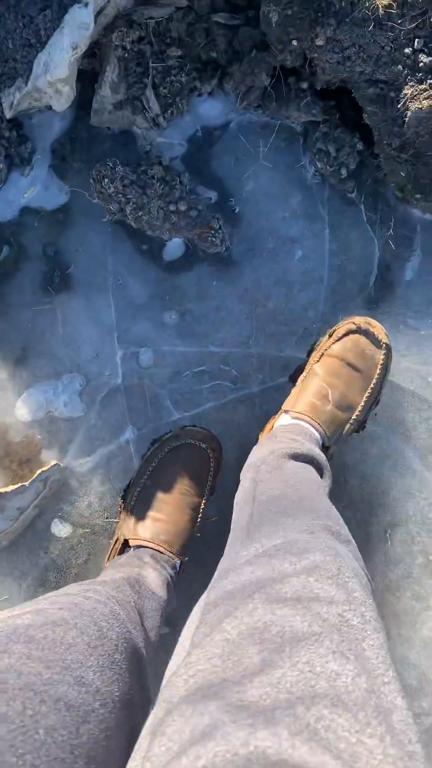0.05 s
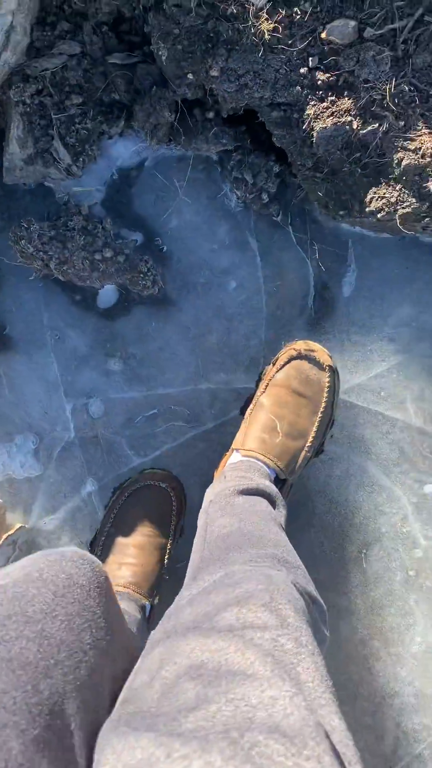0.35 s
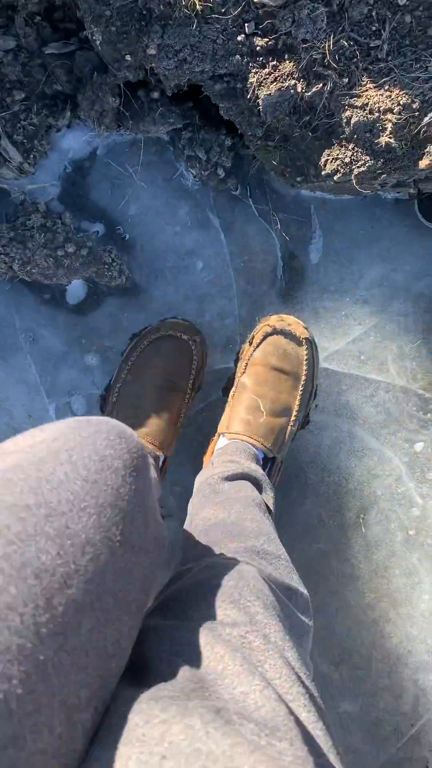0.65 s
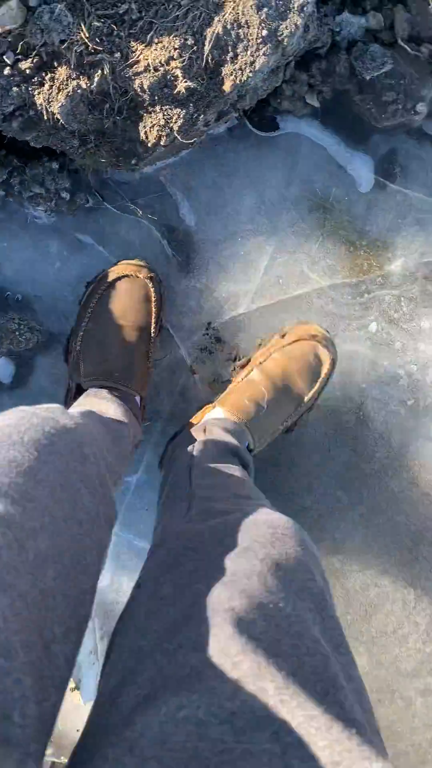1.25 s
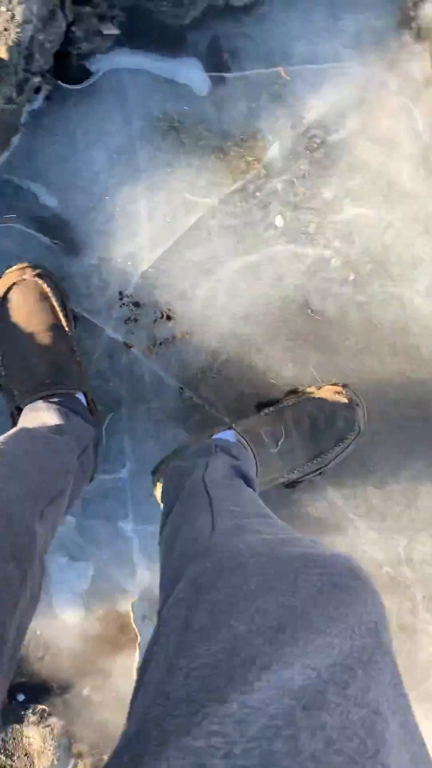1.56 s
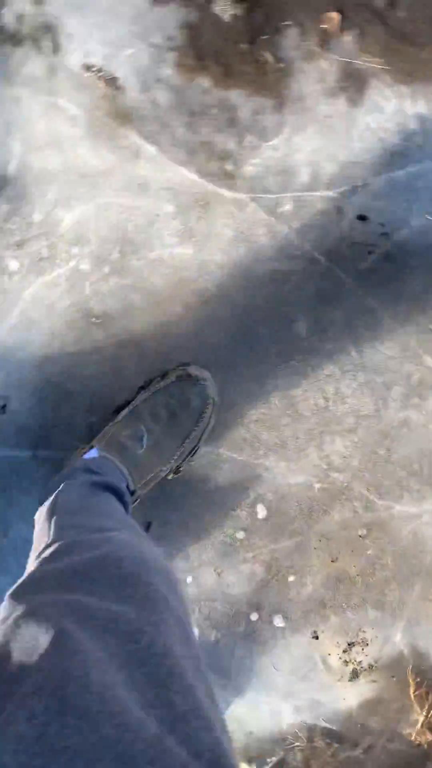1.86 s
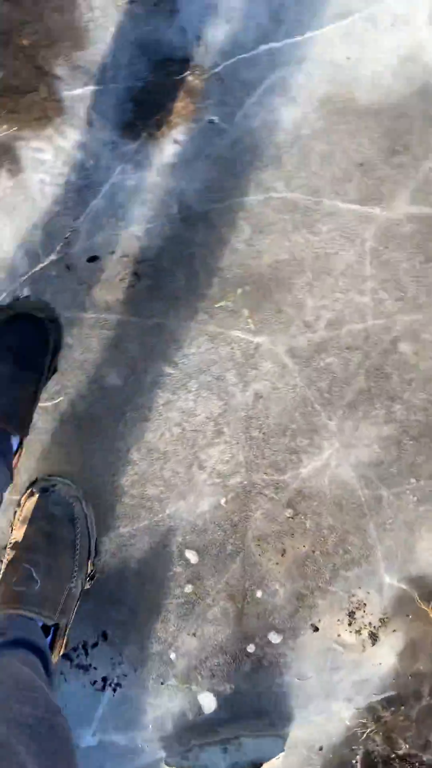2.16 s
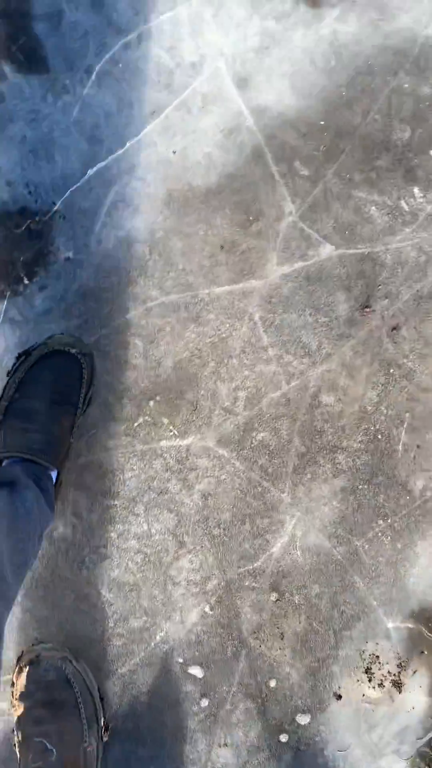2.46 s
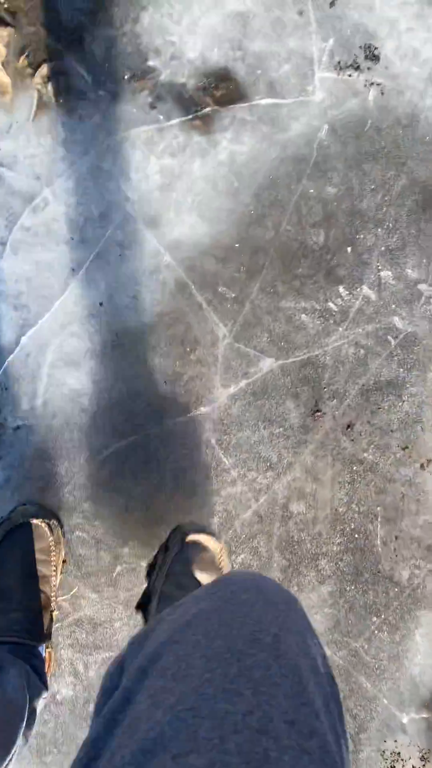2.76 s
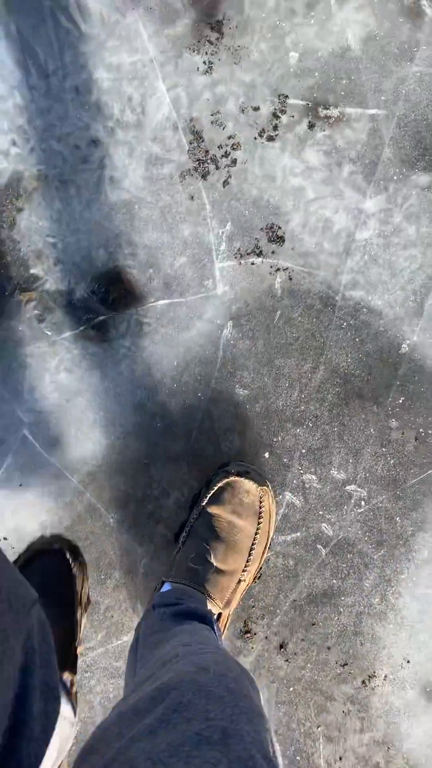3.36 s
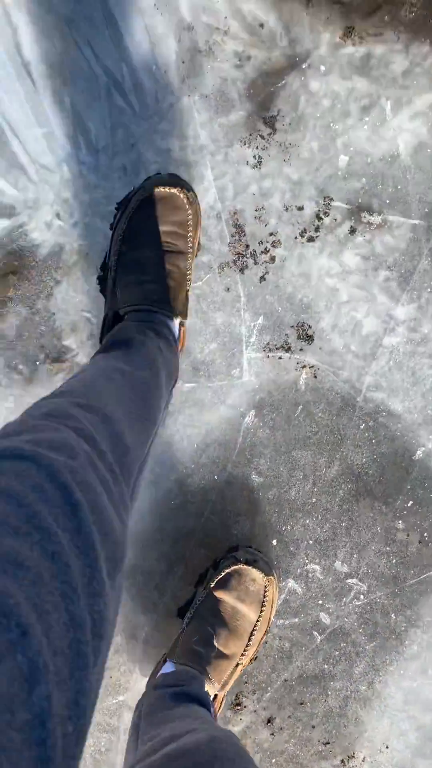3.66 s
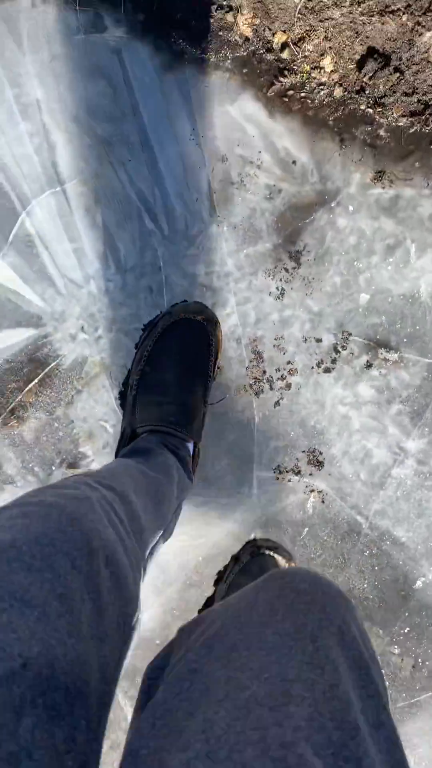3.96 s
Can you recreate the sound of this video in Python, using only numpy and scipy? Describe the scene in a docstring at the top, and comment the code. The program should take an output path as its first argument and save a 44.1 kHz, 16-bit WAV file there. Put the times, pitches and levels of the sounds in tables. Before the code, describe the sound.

Slow steps on a frozen puddle make the ice snap, crackle and creak.

```python
"""Ice cracks under slow steps in soft shoes on a frozen puddle, heard from a phone held above the feet.
Each crack is a snap, then a bending wave whose low notes arrive late: a tiny falling chirp.
Close by, soles scuff over frost, drag and creak, crumbs of ice tick and heels thud softly.
Far off, in the low outdoor rumble, an engine hums and slows a little."""
import sys
import numpy as np
from scipy import signal
from scipy.fft import rfft, irfft
from scipy.io import wavfile
from scipy.ndimage import uniform_filter1d

SR = 44100
rng = np.random.default_rng(int(sys.argv[2]) if len(sys.argv) > 2 else 0)


def transcribe(u):
    """Save the signal u as a 16-bit wav file named by the first command-line argument.

    u: samples, shape (n,) or (channels, n), limited to [-1, 1]; the rate is SR.
    q: integer samples, one column per channel.
    """
    v = np.clip(np.atleast_2d(u).T, -1, 1)
    q = np.round(v * 32767).astype(np.int16)
    wavfile.write(sys.argv[1], SR, q)


N = 176400

# spectrum of a breaking crumb of ice: f/Hz, level/dB
CRUMB_COLOUR = [(100, -17), (500, -8), (1500, -20.5), (3000, -4), (4600, 0), (6500, -5.5), (11000, 0),
                (16000, -7.5)]
FFT_SIZE, LEAD_SAMPLES = 4096, 128  # frame of one short sound, and the room left before its onset
BIN_HZ = np.fft.rfftfreq(FFT_SIZE, 1 / SR)
STEREO_ABOVE_HZ = 700  # below this the two microphones hear nearly the same


def undb(db):
    """Decibels to gain."""
    return 10 ** (np.asarray(db) / 20)


def colour(points, hz=BIN_HZ):
    """Gain at each frequency from points of f/Hz, level/dB."""
    f, db = np.array(points, float).T
    return undb(np.interp(np.log(hz + 1), np.log(f), db))


def shaped(x, points):
    """A sound given a colour, at unit level."""
    y = irfft(rfft(x) * colour(points, np.fft.rfftfreq(N, 1 / SR)), N)
    return y / y.std()


def burst(decay_s):
    """Spectrum of a dying burst of noise with unit energy."""
    y = rng.standard_normal(FFT_SIZE) * np.exp(-np.arange(FFT_SIZE) / SR / decay_s)
    return rfft(y / np.sqrt(np.sum(y ** 2)))


def add(out, at_s, y):
    """Mix a short sound in at a time."""
    i = max(int(at_s * SR), 0)
    out[i:i + len(y)] += y[:max(N - i, 0)]


def waver(per_s):
    """Smooth random drift around zero."""
    hold = int(SR / per_s)
    steps = np.repeat(rng.standard_normal(N // hold + 1), hold)
    return 0.81 * uniform_filter1d(uniform_filter1d(steps, hold), hold)[:N]


def grains(points, per_s=2000, spread_db=3):
    """Dense random clicks of one colour, a few much larger than the rest."""
    size = undb(spread_db * np.minimum(rng.exponential(size=N), 5))
    clicks = (rng.random(N) < per_s / SR) * size * np.sign(rng.standard_normal(N))
    return shaped(clicks, points)


def outdoor_rumble(t):
    """The background of the place: low noise that slowly sinks and swells."""
    # spectrum of the open air: f/Hz, level/dB
    air_colour = [(20, -41.5), (35, -14.5), (55, 4), (90, 0.5), (130, 3), (200, -12.5), (300, -19.5),
                  (500, -36), (1000, -45.5), (2500, -50), (5000, -48), (11000, -49.5), (16000, -42.5)]
    # its loudness: t/s, level/dB
    levels = [(0, -37.5), (.4, -45), (2.2, -44.5), (2.55, -39.5), (2.9, -42.5), (3.2, -41.5), (3.6, -39.5),
              (4, -35)]
    return shaped(rng.standard_normal(N), air_colour) * undb(np.interp(t, *np.array(levels).T))


def far_engine(t):
    """A four-cylinder engine so far away that only its low orders are left."""
    # the engine's run: t/s, firing f/Hz, level/dB
    run = [(0, 72.3, -72), (.4, 72.77, -43.5), (1, 74.06, -37.5), (1.501, 74.4, -38.5), (2.031, 75.02, -39),
           (2.151, 71.85, -38.5), (2.299, 64.24, -45.5), (2.701, 65.04, -44), (3.2, 65.8, -42),
           (4, 65.8, -39.5)]
    # its partials: multiple of the four-stroke cycle, relative level/dB
    orders = [(3, -19), (4, -6), (5, -16), (6, -15.5), (8, 1), (9, -11), (10, -17.5)]
    times, firing_hz, run_db = np.array(run).T
    cycle = 2 * np.pi * np.cumsum(np.interp(t, times, firing_hz)) / SR / 4  # four firings a cycle
    hum = 0
    for order, db in orders:
        gain = undb(db + 3 * waver(5))
        hum += gain * np.sin(order * cycle + 2 * np.pi * rng.random() + 0.075 * waver(7.3))
    return hum * undb(np.interp(t, times, run_db))


def heel_thuds(t, attack_s=0.001, pitch_sag=0.13):
    """Weight lands on the sheet: a few low cycles that sag in pitch."""
    # soft landings of heel and sole: t/s, starting f/Hz, level/dB, decay/s
    landings = [(.001, 213, -15.5, 0.0058), (1.583, 229, -30, 0.0087), (2.368, 220, -27, 0.0031),
                (2.576, 94, -16, 0.02), (2.614, 68.6, -19, 0.035), (2.663, 201, -24, 0.0069),
                (2.678, 72.5, -27, 0.058), (2.686, 229, -20, 0.007), (2.995, 70.5, -26.5, 0.016),
                (3.373, 189, -25, 0.01), (3.41, 76.4, -28.5, 0.062), (3.442, 233, -32.5, 0.015),
                (3.622, 71.6, -22, 0.039)]
    out, age = np.zeros(N), t[:N // 10]
    for at_s, hz, db, decay_s in landings:
        fade = np.exp(-age / decay_s)
        pitch = hz * (1 - pitch_sag * (1 - fade))
        envelope = undb(db) * (1 - np.exp(-age / attack_s)) * fade
        add(out, at_s, envelope * np.sin(2 * np.pi * np.cumsum(pitch) / SR))
    return out


def with_sheet_ring(x, db=-2.5):
    """The ice sheet rings on briefly after a sound with its own hollow notes."""
    # resonances of the sheet: f/Hz, relative level/dB, time to fall 60 dB/s
    modes = [(335, -4, 0.14), (522, -4.5, 0.11), (600, -1.5, 0.093), (716, 1.5, 0.12), (856, -6.5, 0.11),
             (1036, -3, 0.061), (1475, -17, 0.074), (1560, -9.5, 0.1), (1580, -14, 0.2), (2246, 1.5, 0.032),
             (2730, -10.5, 0.15)]
    age = np.arange(N // 20) / SR
    ring = 0
    for hz, mode_db, t60 in modes:
        damping = np.log(1000) / t60
        gain = undb(db + mode_db) * 2 * damping / SR
        ring += gain * np.exp(-damping * age) * np.cos(2 * np.pi * hz * age)
    return x + signal.fftconvolve(x, ring)[:N]


def jolt_sheet(out, at_s, gain, travel_s=.002, echo_db=-7):
    """Mix in one break or slip: a treble snap; below it a rough falling chirp and its rim echoes."""
    airborne_hz, sheet_top_hz = 3400, 1550  # above airborne_hz all arrives at once
    bending_hz = np.minimum(BIN_HZ, airborne_hz)
    # bending waves travel as the root of frequency; travel_s holds at 1 kHz
    lag = 2 * np.pi * travel_s * np.sqrt(1000) * (2 * np.sqrt(bending_hz) - bending_hz / airborne_hz**.5)
    sheet_share = 1 / (1 + (BIN_HZ / sheet_top_hz) ** 4)
    # a crack runs for a moment, which roughens its chirp
    roughness = undb(-2) * burst(decay_s=.0025) * np.minimum(BIN_HZ / sheet_top_hz, 1)
    # the first clear return from the near rim makes the knock hollow
    bounce_s = 0.0045 * (1 + 0.34 * rng.uniform(-0.93, 1))
    bounce = undb(-6.5) * sheet_share * np.exp(-2j * np.pi * BIN_HZ * bounce_s)
    knock = np.exp(2j * np.pi * rng.random()) * (1 + bounce)
    rim_echoes = undb(echo_db) * sheet_share * burst(decay_s=0.0066)
    snap = burst(decay_s=0.0008) + undb(-13) * burst(decay_s=0.0045)
    spectrum = np.sqrt(sheet_share) * (knock + roughness + rim_echoes) + np.sqrt(1 - sheet_share) * snap
    jolt = irfft(gain * np.exp(-1j * lag) * spectrum)
    add(out, at_s - LEAD_SAMPLES / SR, np.roll(jolt, LEAD_SAMPLES))


def frost_scuffs(t):
    """The sole catches and slips: dull rubbing, bright frost grit and lone crumbs swell together."""
    # scuffs of the sole: peak t/s, rise/s, fall/s, rubbing level/dB, grit level/dB
    strokes = [(.075, 0.07, 0.046, -44.5, -56), (0.2, 0.062, 0.038, -38, -34),
               (0.307, 0.059, 0.036, -49.5, -47.5), (0.407, 0.037, 0.04, -52.5, -47),
               (.53, 0.07, 0.087, -60.5, -63.5), (0.809, 0.055, 0.052, -63, -70),
               (0.931, 0.035, 0.028, -43.5, -47.5), (1.021, 0.065, 0.13, -49.5, -56.5),
               (1.3, 0.087, 0.091, -61, -64.5), (1.596, 0.033, 0.046, -55, -58.5),
               (1.691, 0.052, 0.054, -48.5, -54), (1.784, 0.057, 0.029, -50, -52.5),
               (2.3, .04, 0.14, -57, -62), (2.52, 0.2, 0.094, -52.5, -54.5),
               (2.535, 0.037, 0.039, -45.5, -40), (2.7, 0.27, 0.24, -67, -81),
               (3.072, 0.069, 0.067, -44, -36.5), (3.19, 0.071, 0.14, -60.5, -57.5),
               (3.459, 0.1, .1, -66, -64.5), (3.661, 0.026, 0.023, -34, -49.5),
               (3.781, 0.076, 0.11, -53.5, -48.5), (3.865, 0.038, 0.29, -92, -64)]
    # spectrum of the rubbing sole: f/Hz, level/dB
    rub_colour = [(100, -6), (300, 4.5), (520, 2.5), (750, -2), (1200, -2), (2000, -7.5), (3300, -5),
                  (4700, -7), (9000, -26), (16000, -35)]
    # spectrum of the frost grit: f/Hz, level/dB
    grit_colour = [(300, -43.5), (2000, -3.5), (3300, -0.5), (4700, -6.5), (6500, -4), (8700, -1.5),
                   (10500, 0.5), (13000, -5), (16000, -1.5)]
    rub_power, grit_power = np.zeros(N), np.zeros(N)
    for peak_s, rise_s, fall_s, rub_db, grit_db in strokes:
        width_s = np.where(t < peak_s, rise_s, fall_s)
        swell = np.exp(-np.abs((t - peak_s) / width_s) ** 2.13)
        rub_power += (swell * undb(rub_db)) ** 2
        grit_power += (swell * undb(grit_db)) ** 2
    rubbing = np.sqrt(rub_power) * grains(rub_colour)
    frost = np.sqrt(grit_power) * grains(grit_colour, per_s=900, spread_db=4)
    crumbs = np.sqrt(grit_power) * undb(-9) * grains(CRUMB_COLOUR, per_s=210, spread_db=4.5)
    return with_sheet_ring((rubbing + frost) * undb(1.4 * waver(160)) + crumbs)


def sole_squeak(age, sag_per_s=.08):
    """Narrow wavering resonances of the sole that sink a little as it slows."""
    # notes of the dragged sole: starting f/Hz, width/Hz, level/dB
    notes = [(730, 110, -0.5), (1330, 30, -7), (1750, 47, -8.5), (2030, 35, -10), (2313, 37, -6),
             (2670, 35, -4.5), (2980, 53, -11), (3470, 90, -5)]
    turn = 2 * np.pi * np.cumsum(np.exp(-sag_per_s * age)) / SR
    return sum(undb(db) * (waver(2 * width) * np.cos(hz * turn) + waver(2 * width) * np.sin(hz * turn))
               for hz, width, db in notes)


def sole_drag(t, attack_s=0.0072):
    """The sole rasps and squeaks as the foot pivots."""
    # pivot of the foot: start t/s, level/dB, decay/s
    pivots = [(1.649, -35, 0.052)]
    # spectrum of the rasp: f/Hz, level/dB
    rasp_colour = [(150, -22), (520, -2), (760, 4.5), (1150, -4.5), (1750, -11.5), (2500, 6), (3400, -4.5),
                   (4500, 1.5), (6500, -9.5), (16000, -12.5)]
    out = np.zeros(N)
    for at_s, db, decay_s in pivots:
        age = np.maximum(t - at_s, 0)
        envelope = undb(db) * (1 - np.exp(-age / attack_s)) * np.exp(-age / decay_s)
        out += envelope * (grains(rasp_colour) + undb(-4.5) * sole_squeak(age))
    return with_sheet_ring(out)


def sole_creak(first_gap_s=.0075, slowing=1.135, jitter_s=.0006):
    """The sole sticks and slips under load, in a run of slips that slows down."""
    # run of slips: start t/s, number of slips, level/dB
    creaks = [(.999, 8, -10)]
    # spectrum of one slip: f/Hz, level/dB
    slip_colour = [(200, -17), (500, -10.5), (800, 5.5), (1300, -3), (2000, -11), (3400, 0.5), (4700, -5),
                   (7000, -11.5), (16000, -27)]
    out = np.zeros(N)
    for at_s, slips, db in creaks:
        for k in range(slips):
            jolt_sheet(out, at_s + jitter_s * rng.standard_normal(), undb(db) * colour(slip_colour))
            at_s += first_gap_s * slowing ** k
    return with_sheet_ring(out)


def cracking_ice(gain_db=1):
    """Right below the microphones, cracks run through the sheet and crumbs break on top of it."""
    # crumbs breaking under the sole: t/s, relative level/dB
    ticks = [(0.051, -1), (0.077, 3), (0.081, -9), (0.1202, 0), (0.1487, 7), (0.161, 3), (0.2163, -5.5),
             (0.2411, -14), (0.247, -5.5), (0.2642, -17), (0.284, -6), (0.304, -16.5), (0.3212, -12.5),
             (0.3529, -13.5), (0.375, -7), (0.4125, -8), (0.4895, -16.5), (0.5375, -13.5), (0.9365, -12),
             (1.2415, -15.5), (1.2855, -21.5), (1.4911, -18), (1.6296, -12.5), (1.7851, -15),
             (2.241, -25.5), (2.2545, -21.5), (2.2739, -9.5), (2.401, -25), (2.5361, -5.5), (2.9595, -26.5),
             (2.9777, -27), (3.0014, -8.5), (3.0274, -0.5), (3.044, -5.5), (3.0681, -9), (3.0825, 1),
             (3.0871, 7), (3.099, -1), (3.1145, -19), (3.1589, -5), (3.1685, -10.5), (3.192, 5.5),
             (3.245, -19.5), (3.291, -15.5), (3.305, -23.5), (3.651, 4.5), (3.675, 0.5), (3.6905, -16),
             (3.734, -7), (3.7588, -19), (3.764, -16), (3.7799, -15), (3.8566, -6.5), (3.8713, -8.5),
             (3.911, -17), (3.947, -23)]
    # cracks in the sheet, levels relative: t/s, boom level/dB, ring f/Hz, ring level/dB, snap level/dB,
    # splinter level/dB, travel time of a 1 kHz bending wave/s, rim echo level/dB
    cracks = [(0.0631, 15.5, 720, 13.5, 18, 0.5, 0.006, 1.5), (0.0727, 6, 490, 5, 3, -9, 0.0044, -2),
              (0.1083, 21.5, 550, 21.5, 5.5, 8, 0.0077, 0.5), (0.1463, 11, 780, 9, 8, 0, 0.0072, 2),
              (.159, -4.5, 700, 8.5, -11, -9, 0.0044, 6.5), (.187, 12.5, 488, 11, 12, 9, .004, 1),
              (0.1965, 9.5, 342, 14.5, 3.5, 6, .004, -1.5), (0.2051, 9.5, 315, 19.5, -9, -10, .004, -1),
              (0.2103, 9, 600, 3.5, 4, 2, 0.0045, -7.5), (0.4064, -9, 616, -3, -4.5, -12, 0.0063, 0.5),
              (0.776, 7, 526, -2.5, -54, -45, 0.006, -5.5), (0.835, 8.5, 385.5, -2.5, -51, -36, 0.0066, -9),
              (0.9174, 16.5, 780, 22.5, 20, 5.5, 0.0078, -3), (1.0988, 7.5, 907, 13, 9, -4.5, 0.01, 3.5),
              (1.2787, -3.5, 1000, 8, -13.5, -17.5, 0.0089, -2),
              (2.3296, -30, 3450, 5.5, -4, -26, 0.002, -8.5), (3.09, 18, 500, 19.5, 7.5, 6.5, .008, -16),
              (3.1401, 22, 560, 19, 6, 7.5, 0.0064, -13), (3.177, 4, 624, 1.5, -3, 6.5, 0.0074, -12),
              (3.597, -1, 750, -12.5, -20.5, -47, 0.011, -5), (3.6454, -1, 1440, 22.5, 14, 6, 0.0053, -3.5),
              (3.6607, 21, 504, 1, 15, 7.5, 0.0041, -1.5), (3.669, 2.5, 1430, 13.5, 11.5, 5.5, 0.0056, 0),
              (3.7904, 8, 583.5, 3.5, 8, 2, 0.0045, 2), (3.839, 29, 1160, 16, 26, 10, 0.0068, -8.5)]
    boom_hz, snap_hz, splinter_band_hz, low_cut_hz = 237, 3260, (4700, 9000), 149
    low_cut = BIN_HZ ** 2 / np.sqrt(BIN_HZ ** 4 + low_cut_hz ** 4)
    out = np.zeros(N)
    for at_s, db in ticks:
        jolt_sheet(out, at_s, undb(gain_db + db) * colour(CRUMB_COLOUR))
    for at_s, boom_db, ring_hz, ring_db, snap_db, splinter_db, travel_s, echo_db in cracks:
        points = [(boom_hz, boom_db), (ring_hz, ring_db), (snap_hz, snap_db)]
        points += [(hz, splinter_db) for hz in splinter_band_hz]
        # low points on either side let the ring stand out
        points += [(np.sqrt(boom_hz * ring_hz), min(boom_db, ring_db)),
                   (ring_hz * 2 ** 0.79, ring_db - 11.5)]
        jolt_sheet(out, at_s, undb(gain_db) * low_cut * colour(sorted(points)), travel_s, echo_db)
    return with_sheet_ring(out, db=-4)


def microphones(x, scatter_above_hz=800):
    """Sound reaches the phone's two microphone ports at different times, with a little scatter."""
    # left port against right: f/Hz, phase lead/rad, level/dB
    ports = [(550, 0, 1.5), (850, -.4, 1), (1100, -1.1, 1), (1550, -1.2, -1), (1850, 1, -4),
             (2200, 2.4, -5), (3000, 2.1, -3), (4000, 2.6, 0), (4700, 3.2, 0), (8900, 9.4, 0),
             (13300, 15.7, .5), (16000, 19.2, .5)]
    hz, lead, balance_db = np.array(ports).T
    apart = BIN_HZ ** 4 / (BIN_HZ ** 4 + STEREO_ABOVE_HZ ** 4)
    left = np.exp(.5j * apart * np.interp(BIN_HZ, hz, lead))
    left *= undb(apart * np.interp(BIN_HZ, hz, balance_db) / 2)
    scatter = undb(-12) * BIN_HZ ** 2 / (BIN_HZ ** 2 + scatter_above_hz ** 2)
    responses = [irfft(side + scatter * burst(decay_s=.0018)) for side in (left, 1 / left)]
    return np.array([signal.fftconvolve(x, np.roll(h, FFT_SIZE // 2), "same") for h in responses])


def scene():
    """Close footsteps on the ice over the far engine and the rumble; some scuffing scatters wide."""
    t = np.arange(N) / SR
    rumble = outdoor_rumble(t)
    highpass = signal.butter(4, STEREO_ABOVE_HZ, "high", fs=SR, output="sos")
    wide_scuffs = undb(-12) * signal.sosfilt(highpass, [frost_scuffs(t), frost_scuffs(t)])
    feet = cracking_ice() + frost_scuffs(t) + sole_drag(t) + sole_creak()
    return microphones(feet + rumble) + wide_scuffs + heel_thuds(t) + far_engine(t)


def record(dry):
    """The phone rounds the sharpest peaks and cuts the top."""
    ceiling, top_hz = .8, 16500
    lowpass = signal.ellip(8, .2, 70, top_hz, fs=SR, output="sos")
    return signal.sosfilt(lowpass, ceiling * np.tanh(dry / ceiling))


dry = scene()
out = record(dry)
transcribe(out)
```